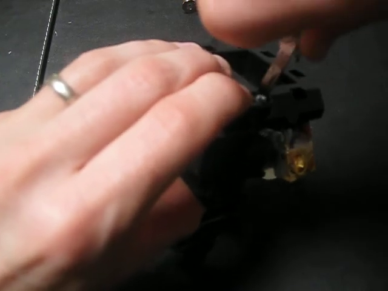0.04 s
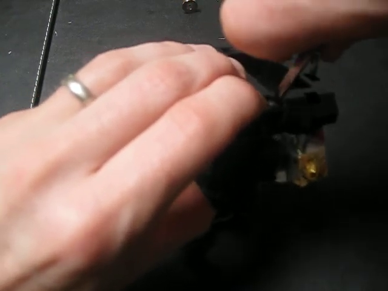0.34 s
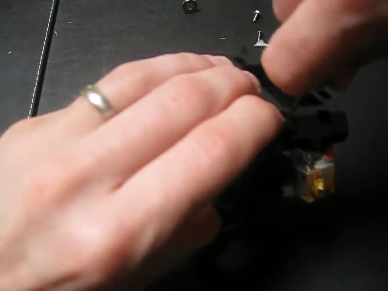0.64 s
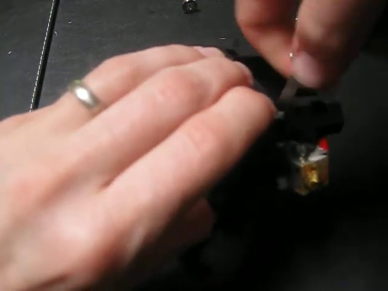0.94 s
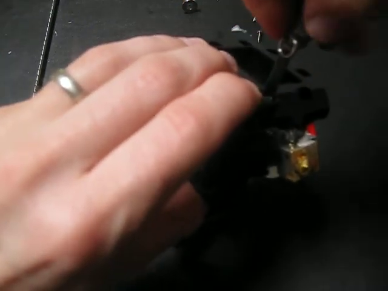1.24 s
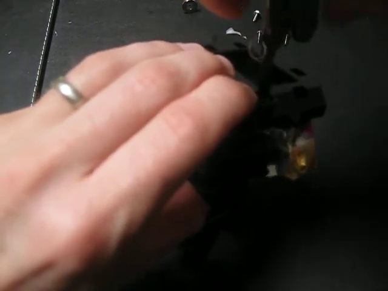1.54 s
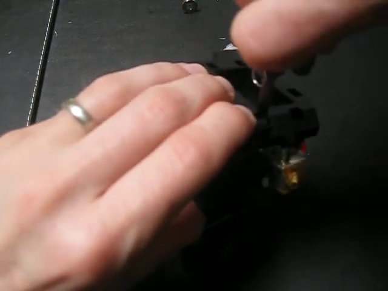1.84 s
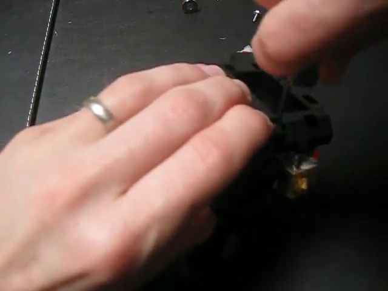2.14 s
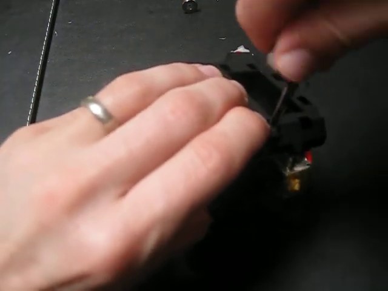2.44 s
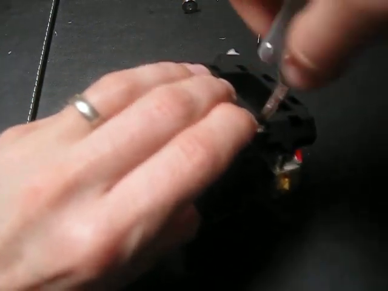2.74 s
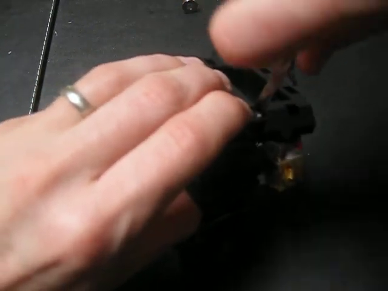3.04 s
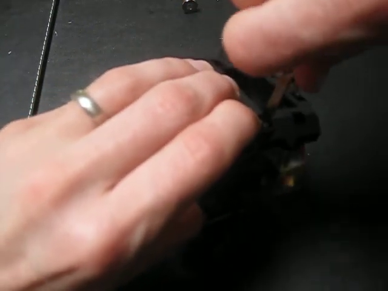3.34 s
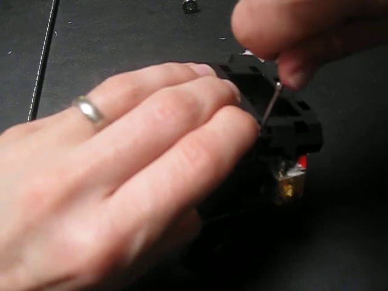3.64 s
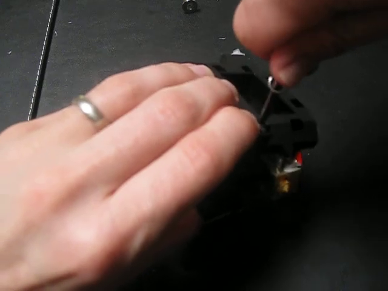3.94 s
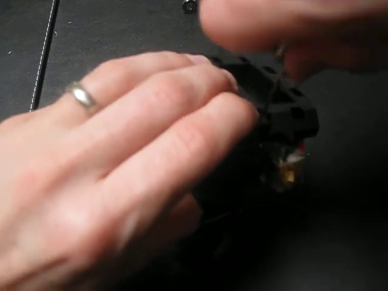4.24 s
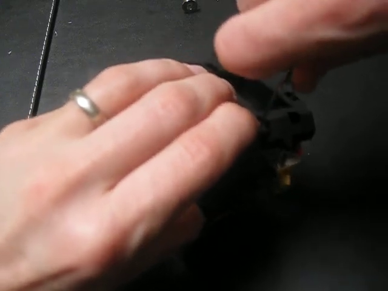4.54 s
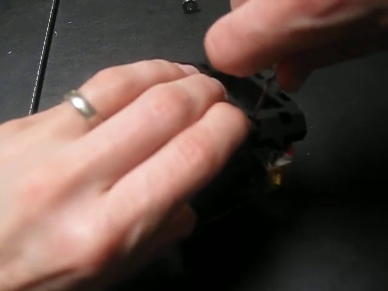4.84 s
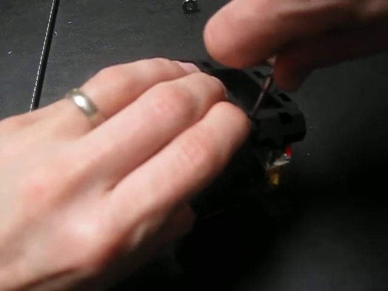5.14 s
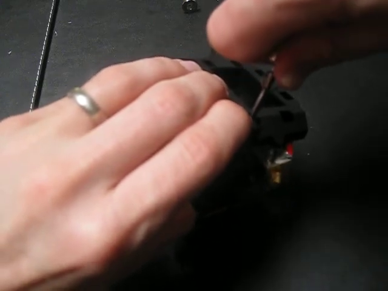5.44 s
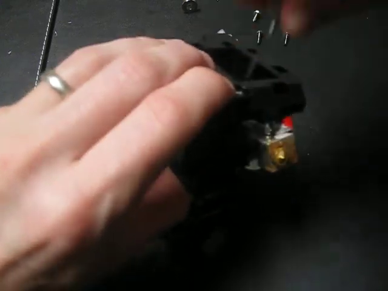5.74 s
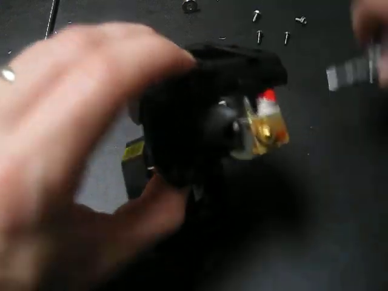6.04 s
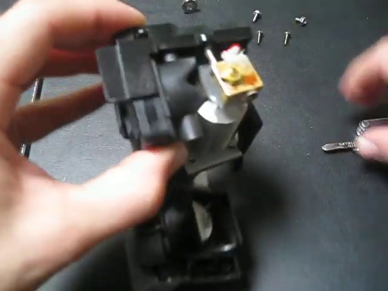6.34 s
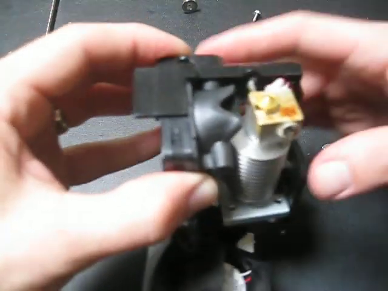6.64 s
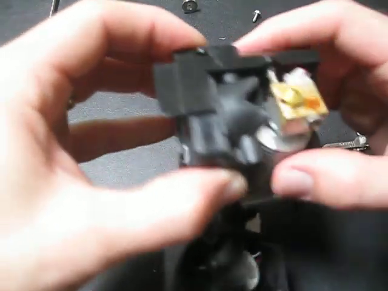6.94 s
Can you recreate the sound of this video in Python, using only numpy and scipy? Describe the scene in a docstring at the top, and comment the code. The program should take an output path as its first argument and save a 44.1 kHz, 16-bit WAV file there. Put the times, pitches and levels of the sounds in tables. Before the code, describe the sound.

A small screwdriver clicks and scrapes in a screw in plastic housing, then a part knocks sharply onto a desk.

```python
"""A small room, close to a desk, where a small screwdriver works a screw in a plastic housing.
The blade scrapes and clicks in the screw head, which makes blade and housing ring. The thread rubs,
fingers rustle, and the housing bumps the desk under the hand. Near the end a loose part and the tool
knock down on the desk, and plastic edges snap past each other. A soft hiss lies under it all."""
import sys
import numpy as np
from scipy import signal
from scipy.fft import rfft, irfft
from scipy.io import wavfile

SR = 44100
rng = np.random.default_rng(int(sys.argv[2]) if len(sys.argv) > 2 else 0)


def generate_wav(signal):
    """Clip the signal to [-1, 1] and save it as 16-bit WAV at the path in sys.argv[1]."""
    frames = np.transpose(np.atleast_2d(signal))
    scaled = np.clip(frames, -1, 1) * 32767
    pcm = np.round(scaled).astype(np.int16)
    wavfile.write(sys.argv[1], SR, pcm)


N = 313102

# In the tables, level_db compares rows; each layer gets its overall volume afterwards.
# A contact has a middle (3-8 kHz); body_db (below it) and tick_db (above it) count from its level.
# fingers shift on tool and housing: start_s, length_s, level_db
FINGER_MOVES = [(0.2, 0.66, -60), (0.76, 0.07, -54), (0.9, 0.39, -53), (1.32, 0.43, -55.5),
                (2.85, 0.42, -56.5), (5.65, 0.42, -53.5), (6.75, 0.25, -58)]
# how firmly the blade sits in the screw: time_s, share (0 loose, 1 firm)
BLADE_GRIP = [(0, 0.26), (1.8, 0.47), (2.6, 0.73), (5.2, 0.72), (5.65, 0.53), (6, 0.12), (6.7, 0.68)]
# the tones at which the blade rings: pitch_hz, width_hz, level_db
BLADE_TONES = [(1685, 450, -3.5), (2537, 85, 2.5), (3860, 230, 5), (4344, 580, 1.5), (5100, 210, 3),
               (5580, 270, -0.5), (10900, 2200, -9), (13100, 1050, -1.5)]


def undb(db):
    """Turn decibels into a volume factor."""
    return 10 ** (np.asarray(db) / 20)


def unit(x):
    """Scale a sound to an average power of 1."""
    return x / np.sqrt(np.mean(x ** 2))


def add(out, s, x):
    """Mix x in, starting at s seconds."""
    i = int(s * SR)
    out[i:i + len(x)] += x[:max(len(out) - i, 0)]


def band(x, hz, kind, order=4):
    """Keep the lows, the highs or a band in between."""
    return signal.sosfilt(signal.butter(order, hz, kind, fs=SR, output="sos"), x)


def ring(x, tones, scatter_db=0, detune=0):
    """Make an object ring; scatter_db and detune vary its tones, as touching a different spot does."""
    out = 0
    for k, (hz, width, db) in enumerate(tones):
        level_luck, pitch_luck = rng.standard_normal(2)
        resonance = signal.iirpeak(hz * (1 + detune * pitch_luck), hz / width, fs=SR)
        out = out + (-1) ** k * undb(db + scatter_db * level_luck) * signal.lfilter(*resonance, x)
    return out


def balance(x, length_s, db, body_db, tick_db):
    """Set the low body, the middle and the high tick of a contact, each as a level over length_s."""
    parts = [(band(x, 3000, "low"), body_db),
             (band(x, [3000, 7800], "band"), 0),
             (band(x, 8200, "high"), tick_db)]
    return sum(undb(db + extra) * p * np.sqrt(length_s * SR / np.sum(p ** 2)) for p, extra in parts)


def slips(count, per_s, spread_db):
    """Surfaces stick and slip: tiny random pushes; spread_db makes a few much stronger."""
    when, size, sign = rng.random((3, count))
    strength = undb(-spread_db * np.log(size * .98 + .02))
    return (when < per_s / SR) * strength * np.sign(sign - .5)


def blow(crush_s, crush):
    """A sharp push, then a quickly fading noise as the contact is crushed."""
    t = np.arange(2048) / SR
    push = crush * rng.standard_normal(len(t)) * np.exp(-t / crush_s)
    push[0] += 1
    return push


def strokes(moves):
    """The volume curve of hand movements that swell, hold and let go."""
    swell_share, release_share = 0.072, 0.23
    t, gain = np.arange(N) / SR, np.zeros(N)
    for s, length_s, db in moves:
        progress = (t - s) / length_s
        gain += undb(db) * np.clip(np.minimum(progress / swell_share, (1 - progress) / release_share), 0, 1)
    return gain


def room_noise():
    """Steady room noise and microphone hiss, strongest in the bass."""
    # the tone colour of the noise: pitch_hz, level_db
    noise_colour = [(15, -24), (25, 1.5), (66, -7), (236, -0.5), (363, -2.5), (516, -3), (988, -4.5),
                    (1330, -4.5), (1650, -7), (2690, -9), (4250, -12), (5000, -13.5), (7920, -15.5),
                    (12200, -17.5), (16000, -24)]
    hz, db = np.transpose(noise_colour)
    pitches = np.maximum(np.arange(N // 2 + 1) * SR / N, 1)
    gain = undb(np.interp(np.log(pitches), np.log(hz), db))
    return undb(-53.5) * unit(irfft(rfft(rng.standard_normal(N)) * gain, N))


def room_echo(x):
    """Early echoes from the desk and a wall, and a short wash of sound that dies away."""
    # the wash, band by band: top_hz, fade_s (time to fall 60 dB), level_db
    echo_bands = [(530, 0.25, -13), (888, 0.32, -21), (2300, 0.34, -18), (3960, 0.35, -22),
                  (7700, 0.31, -19), (15200, 0.26, -13)]
    t = np.arange(int(.7 * SR)) / SR
    onset = 1 - np.exp(-t / 0.00054)
    response, low_hz = np.zeros(len(t)), 120
    for top_hz, fade_s, db in echo_bands:
        noise = band(rng.standard_normal(len(t)), [low_hz, top_hz], "band")
        tail = noise * np.exp(-np.log(1000) * t / fade_s) * onset
        response += undb(db) * tail / np.sqrt(np.sum(tail ** 2))
        low_hz = top_hz
    for delay_s, gain in [(.0034, 0.074), (.0205, 0.13)]:
        response[int(delay_s * SR)] += gain
    return signal.fftconvolve(x, response)[:N]


def desk_ring(x):
    """Desk and room ring along with each contact."""
    # their low tones: pitch_hz, width_hz, level_db
    desk_tones = [(144.6, 4.6, 6), (187.3, 7.2, 16.5), (291.5, 13.4, 5.5), (395, 8, 4), (1290, 5.9, -25),
                  (1360, 6.4, -24)]
    return undb(-5.0) * ring(x, desk_tones)


def finger_rustle():
    """Fingers slip on tool and housing with a faint, high rustle."""
    rustle = band(slips(N, per_s=1000, spread_db=6), [3200, 6200], "band", order=2)
    return undb(-4.0) * unit(rustle * catching()) * strokes(FINGER_MOVES)


def catching():
    """A volume curve that wavers at random, as rubbing surfaces catch unevenly."""
    return undb(3 * unit(band(rng.standard_normal(N), 22, "low", order=2)))


def thread_rasp():
    """The turning thread catches and rasps in the plastic."""
    # turns of the screw: start_s, length_s, level_db
    turns = [(2.74, 0.11, -44), (2.89, 0.37, -49), (3.44, 0.24, -52), (3.8, 0.2, -52), (4.03, 0.27, -45.5),
             (4.36, 0.37, -52), (5.5, 0.18, -52.5)]
    tones = [(1700, 350, -3), (2420, 160, 5.5), (2790, 245, 6.0), (4320, 1400, -10)]
    rasp = ring(slips(N, per_s=750, spread_db=0) * catching(), tones)
    return undb(-7.0) * unit(rasp) * strokes(turns)


def blade_rattle():
    """The loose blade ticks faintly at random while the fingers shift."""
    ticks = signal.fftconvolve(slips(N, per_s=33, spread_db=5), blow(crush_s=0.0015, crush=0.53))[:N]
    sound = ring(ticks, BLADE_TONES) + 0.12 * band(ticks, 2500, "high", order=2)
    return undb(-3.5) * unit(sound) * strokes(FINGER_MOVES)


def desk_bumps():
    """The housing lands on the desk and shudders, and near the end the dropped part and the set-down tool thud
    low on it; shorter bumps are harder and brighter."""
    # the landings of the housing, and from 6.15 s the thuds of the part and the tool: start_s, length_s,
    # level_db
    landings = [(0.271, 0.0044, -43.5), (0.561, 0.0068, -37), (0.642, 0.013, -48.5), (1.554, 0.012, -39),
                (1.694, 0.016, -48), (2.109, 0.011, -47), (2.331, 0.033, -47), (2.981, 0.035, -52.5),
                (3.13, 0.055, -58), (3.3308, 0.0042, -38), (3.794, 0.067, -52), (4.476, 0.02, -53.5),
                (5.833, 0.044, -53), (6.153, 0.0099, -27), (6.177, 0.034, -39.5), (6.2903, 0.0039, -28.5)]
    # broad tones of the housing resting on the desk: pitch_hz, width_hz, level_db
    resting_tones = [(186, 370, -5), (418, 267, 1.5), (580, 140, 0.5), (930, 470, -2)]
    out = np.zeros(N)
    for s, length_s, db in landings:
        count = int(length_s * SR)
        force = 0.055 * rng.standard_normal(count) * np.linspace(1, .4, count)
        force[0] += 1
        db_per_octave = 0.5 * np.log2(0.016 * SR / count)  # no tilt for a bump of 0.016 s
        tones = [(hz, width, level + db_per_octave * np.log2(hz / 400))
                 for hz, width, level in resting_tones]
        thud = band(ring(np.pad(force, (0, 2048)), tones), 1350, "low")
        add(out, s, undb(db) * thud * np.sqrt(count / np.sum(thud ** 2)))
    return undb(0.5) * band(out, 93, "high", order=2)


def strikes(hits, tones, crush_s, crush, crack):
    """Blows on a plastic object, heard as its ringing plus a direct crack."""
    out = np.zeros(N)
    for s, db, body_db, tick_db in hits:
        push = blow(crush_s, crush)
        ringing = ring(push, tones, scatter_db=2.0, detune=0.0075)
        sound = ringing + crack * band(push, 700, "high", order=2)
        add(out, s, balance(sound, 0.0044, db, body_db, tick_db))
    return out


def plastic_snaps():
    """Plastic edges snap past each other and make the shell ring; the last row is a thin, high tick of the
    blade."""
    # the snaps, and last a thin high tick of the blade: start_s, level_db, body_db, tick_db
    snaps = [(0.2752, -47, 15.5, -11), (0.2948, -24.5, -6, -24), (0.6423, -50.5, 9, -2),
             (2.6974, -46, 7, -21), (3.0656, -52.5, 2.5, -15), (4.967, -48.5, -5, -21),
             (6.0854, -49, -0.5, -21), (7.0578, -29.5, -8, -17), (7.073, -38, -9, 16)]
    # tones of the plastic shell: pitch_hz, width_hz, level_db
    shell_tones = [(1000, 180, -30), (1570, 420, -7), (2600, 2400, 10), (3640, 98, 7.5),
                   (4220, 3100, -12.5), (6800, 1300, 2.5), (11700, 4800, 3)]
    return undb(3.0) * strikes(snaps, shell_tones, crush_s=0.0033, crush=0.19, crack=0.047)


def desk_knocks(widen):
    """A loose part, then the tool, hits the desk; widen blurs their tones and adds more crack."""
    # the part drops and the tool is put down: start_s, level_db, body_db, tick_db
    part_hits = [(6.1561, -10.5, -4, -7.5)]
    tool_hits = [(6.275, -29.5, 2.7, -9), (6.2853, -32.5, 5, -12), (6.2914, -22.5, 3.8, -4.5)]
    # tones of the part and of the tool's handle: pitch_hz, width_hz, level_db
    part_tones = [(1350, 310, 11), (1600, 530, 2.5), (1750, 360, -9), (3510, 510, 7.5), (4850, 430, 6),
                  (4980, 98, 9), (6140, 350, 3), (10450, 340, -3), (12000, 880, -25)]
    handle_tones = [(794, 260, -5), (1260, 320, 3), (2230, 670, -1), (2850, 660, 2), (4000, 1800, -4),
                    (5860, 3900, -8), (9600, 1400, -10), (13600, 1400, -12)]
    blur = np.array([1, widen, 1])
    part = strikes(part_hits, blur * part_tones, crush_s=0.00082, crush=0.067, crack=0.037 * widen)
    tool = strikes(tool_hits, blur * handle_tones, crush_s=0.0028, crush=0.27, crack=0.072 * widen)
    return part + tool


def screw_contact(push, s):
    """A loose blade rings by itself; a firm one makes the housing ring and softens the direct crack."""
    # tones of the housing: pitch_hz, width_hz, level_db
    housing_tones = [(967, 173, -12), (1808, 230, -1), (2490, 140, 3), (2844, 178, 0.5), (3720, 146, 0.5),
                     (3990, 360, 1), (4680, 470, 3.5), (5710, 470, 2), (6085, 970, -2.5), (8900, 1370, -3),
                     (10500, 3100, -28.5)]
    grip = np.interp(s, *np.transpose(BLADE_GRIP))
    housing = ring(push, housing_tones, scatter_db=4.5, detune=0.032)
    blade = ring(push, BLADE_TONES, scatter_db=1, detune=0.022)
    crack = signal.lfilter([1, -1], [1, -np.exp(-2 * np.pi * 1200 / SR)], push)  # fewer lows
    return grip * housing + (1 - grip) * blade + 0.062 * undb(-6 * grip) * crack


def slide(s, length_s, db, body_db, tick_db):
    """One slide of the tip: a fast run of slips rings blade and housing."""
    count = int(length_s * SR)
    push = slips(count, per_s=2500, spread_db=5.5) * signal.windows.tukey(count, .4)
    return balance(screw_contact(np.pad(push, (0, count)), s), length_s, db, body_db, tick_db)


def blade_scrapes():
    """The tip scrapes across the screw head; the firmer the blade sits, the fuller it sounds."""
    # the scrapes: start_s, length_s, level_db
    scrapes = [(0.203, 0.018, -48), (0.445, 0.035, -43), (0.51, 0.015, -45.5), (0.56, 0.028, -43.5),
               (0.639, 0.03, -41.5), (0.909, 0.025, -41.5), (0.968, 0.023, -37), (1.001, 0.075, -46.5),
               (1.545, 0.038, -45), (1.645, 0.092, -48), (2.073, 0.091, -49.5), (2.324, 0.037, -49.5),
               (2.975, 0.038, -49.5), (3.46, 0.08, -56), (3.599, 0.02, -39.5), (3.793, 0.063, -40),
               (4.066, 0.049, -41), (4.147, 0.013, -45), (4.191, 0.033, -48.5), (5.613, 0.098, -35.5),
               (5.867, 0.012, -37.5), (5.883, 0.014, -31), (7.047, 0.057, -37.5)]
    out = np.zeros(N)
    for s, length_s, db in scrapes:
        grip = np.interp(s, *np.transpose(BLADE_GRIP))
        add(out, s, slide(s, length_s, db, body_db=-10 + 11 * grip, tick_db=-11))
    return undb(-1.5) * out


def blade_clicks():
    """The blade grinds up the wall of the screw's slot, lets go, bounces once and skids to rest."""
    # the clicks: start_s, level_db, body_db
    clicks = [(0.092, -28.5, -14.5), (0.3636, -36.5, -21), (0.4724, -46, -7), (0.5665, -33, -17),
              (0.622, -37, -18), (0.6481, -30, -20), (0.66, -36, -17), (0.785, -47, -12),
              (0.8692, -28, -18), (0.9166, -48.5, 10.5), (0.948, -42, -17), (0.9752, -40, -10),
              (1.0055, -32, -9), (1.0215, -35, -10), (1.098, -38.5, -11), (1.1197, -39.5, -5.5),
              (1.1818, -39, -6.5), (1.332, -50, -12), (1.3835, -34.5, -11.5), (1.4544, -38.5, -9),
              (1.5115, -42, -7), (1.621, -40, -9), (1.658, -38, -6), (1.6996, -42.5, 4.5),
              (1.7585, -45.5, 3), (1.9002, -53, 8), (1.9505, -36, -9), (2.3447, -39, -8), (2.644, -44, -7),
              (2.677, -24, -16), (3.112, -29.5, -4.5), (3.333, -43, -8), (3.6025, -34.5, -6),
              (3.8133, -27.5, 0.5), (3.948, -25, -8.5), (4.0907, -37, -6), (4.118, -40.5, -4),
              (4.4307, -26, -6), (4.454, -34, -5), (4.9067, -31, -8), (5.0055, -38.5, -1.5),
              (5.1263, -42, -1.5), (5.6316, -34.5, -23), (5.678, -24, -4.5), (5.8, -45.5, -3),
              (5.8909, -27, -14.5), (5.971, -27.5, -7), (6.6718, -36, -3), (6.9684, -50.5, 7.5),
              (7.0703, -27.5, -4.5), (7.0915, -23, -7.5)]
    # how bright the clicks are as time passes: time_s, tick_db
    brightness = [(0.09, -7), (0.5, -23), (1.0, -7.5), (1.5, -22), (2.0, -11), (3.3, -1), (3.85, -11),
                  (4.4, -6.5), (5.05, -12.5), (6.7, 1.5), (7.1, -7)]
    out, count = np.zeros(N), int(0.0089 * SR)
    for (s, db, body_db), luck in zip(clicks, rng.standard_normal(len(clicks))):
        tick_db = np.interp(s, *np.transpose(brightness))
        grind_gain = 0.078 * undb(-2 * max(db + 29.5, 0))  # the hardest clicks give little warning
        grind = grind_gain * rng.standard_normal(count) * np.linspace(0, 1, count) ** 2
        push = np.concatenate([grind, blow(crush_s=0.0015, crush=0.28)])
        add(out, s - count / SR, balance(screw_contact(push, s), 0.0052, db, body_db, tick_db))
        bounce = screw_contact(blow(crush_s=0.0013, crush=0.21), s)
        delay_s = 0.0067 * np.exp(0.25 * luck)
        add(out, s + delay_s, balance(bounce, 0.0047, db - 11, body_db, tick_db))
        skid = slide(s, 0.016, db - 18, body_db, tick_db)
        add(out, s - 0.003, skid)
    return undb(-0.5) * out


def scene():
    """Mix the work on the desk with its echo and the room noise, in one channel."""
    handling = plastic_snaps() + blade_clicks() + blade_scrapes()
    handling += blade_rattle() + thread_rasp() + finger_rustle()
    thuds = desk_bumps()
    direct = handling + thuds + undb(-1.0) * desk_knocks(widen=1)
    # the walls get a knock from all its sides, so its colour is smoother there; thuds carry poorly
    to_walls = handling + undb(-4.5) * thuds + undb(-2.0) * desk_knocks(widen=3.47)
    return (direct + room_echo(to_walls) + desk_ring(direct) + room_noise())[None]


def record(dry):
    """The microphone rounds hard peaks and drops the deepest bass, a dip near 8 kHz and the very top."""
    rounded = band(0.78 * np.tanh(dry / 0.8), 32, "high", order=2)
    notched = signal.lfilter(*signal.iirnotch(7900, 4, fs=SR), rounded)
    return signal.sosfilt(signal.ellip(10, .2, 80, 16100, fs=SR, output="sos"), notched)


dry = scene()
out = record(dry)
generate_wav(out)
```